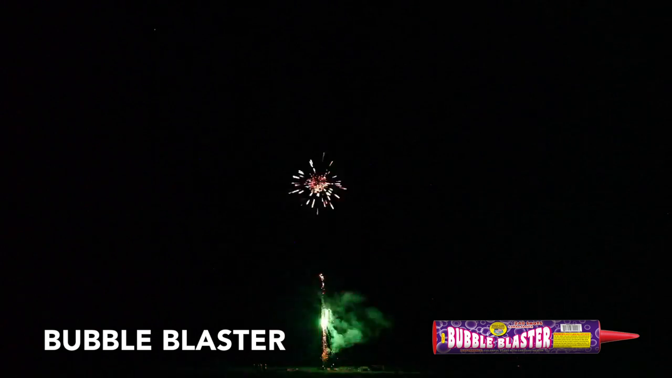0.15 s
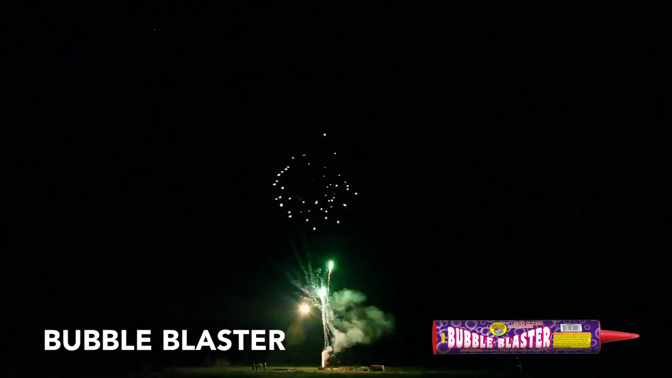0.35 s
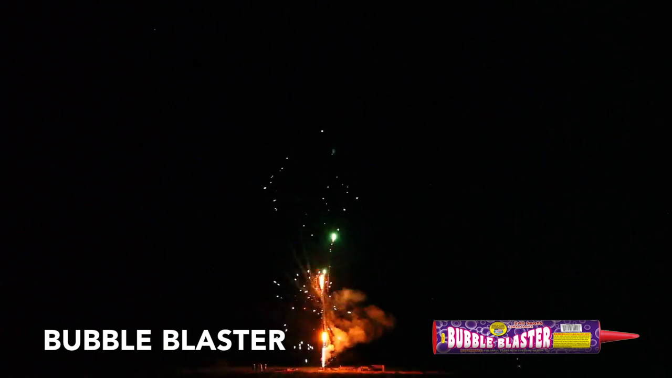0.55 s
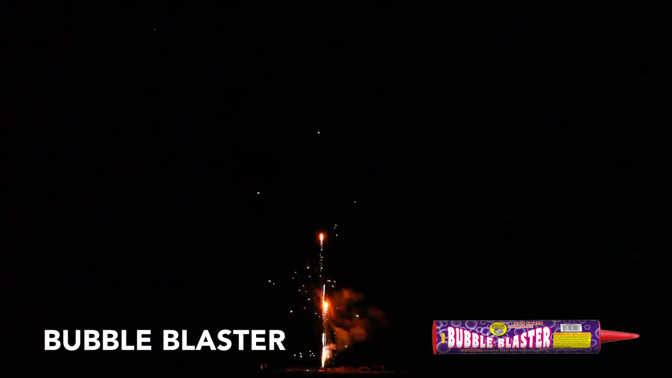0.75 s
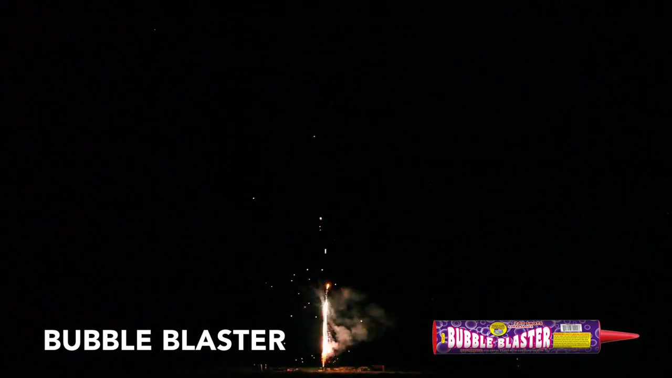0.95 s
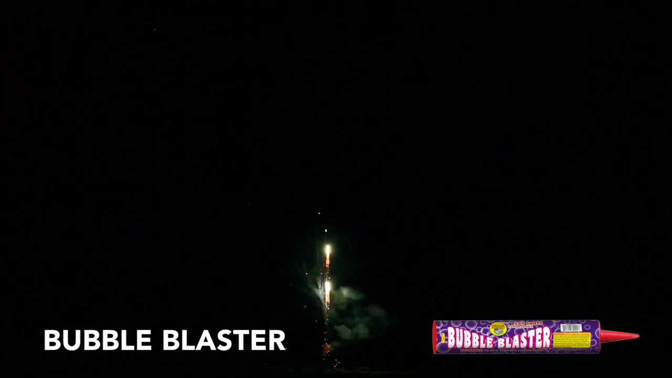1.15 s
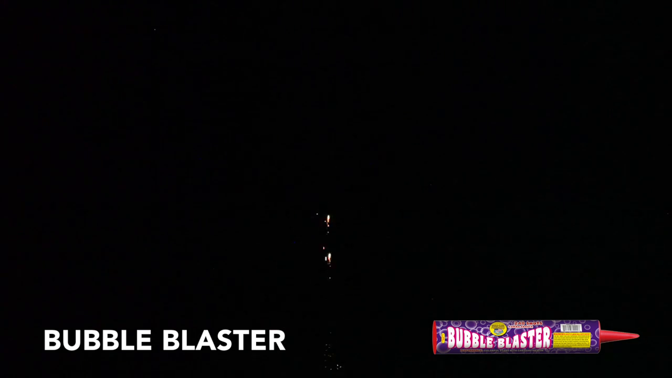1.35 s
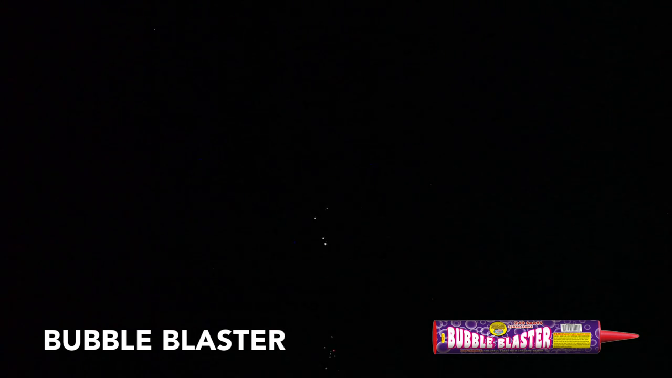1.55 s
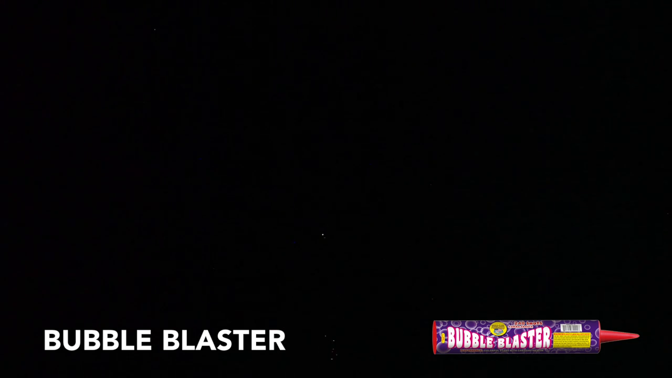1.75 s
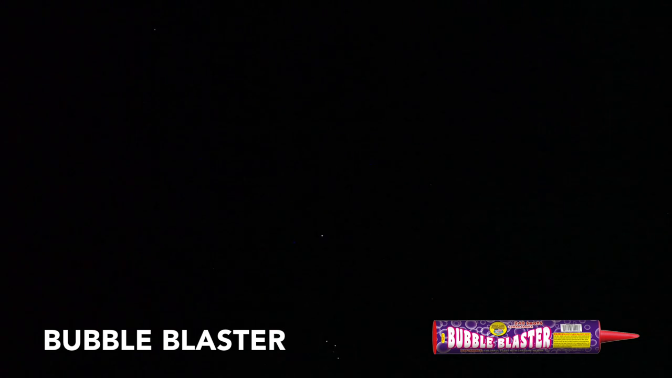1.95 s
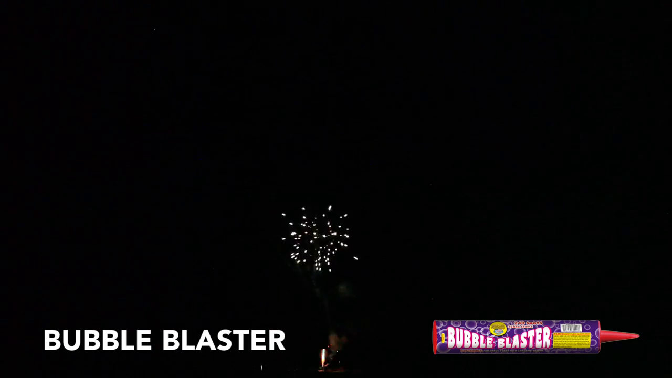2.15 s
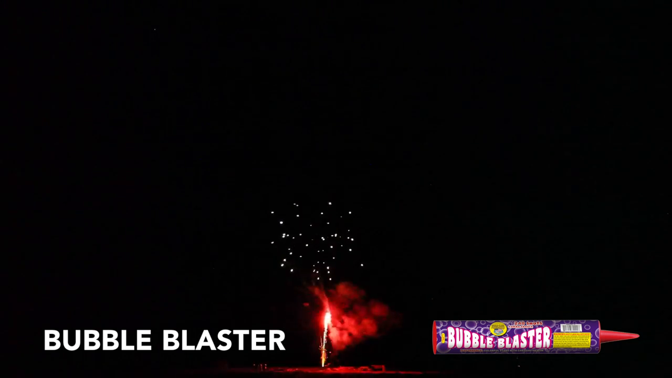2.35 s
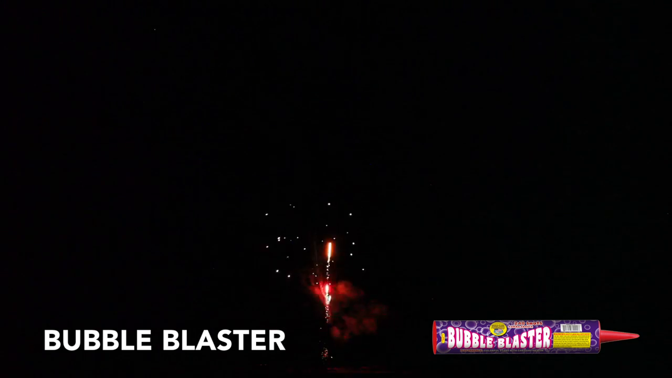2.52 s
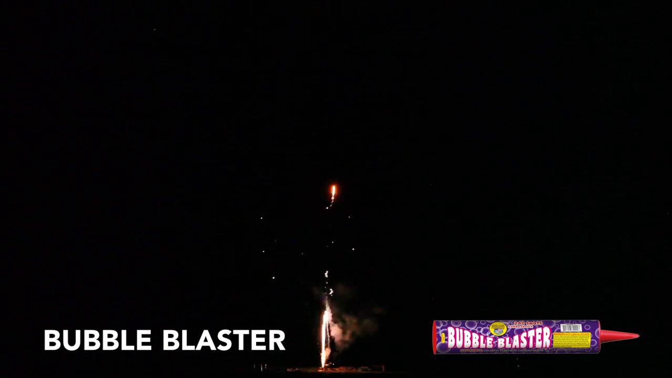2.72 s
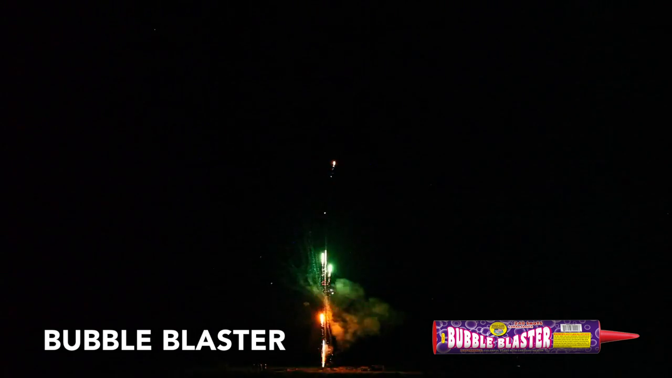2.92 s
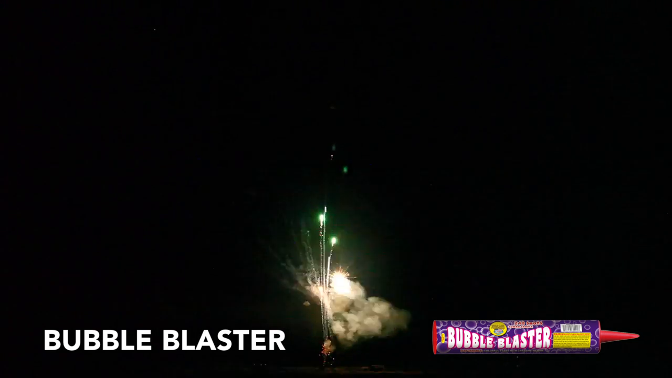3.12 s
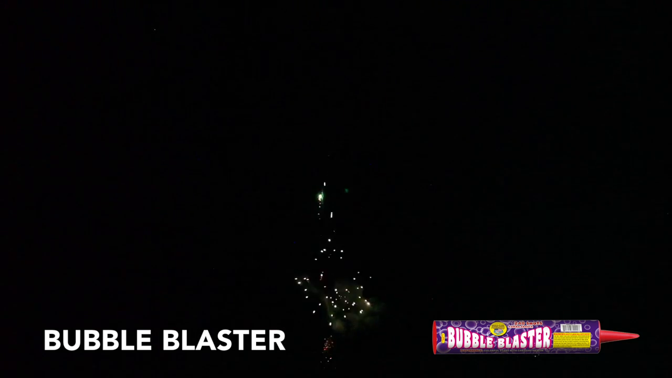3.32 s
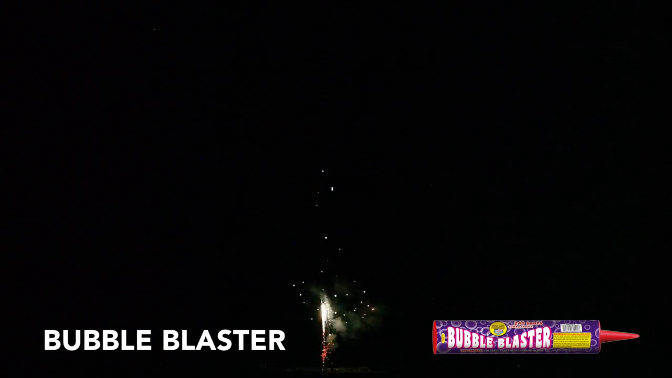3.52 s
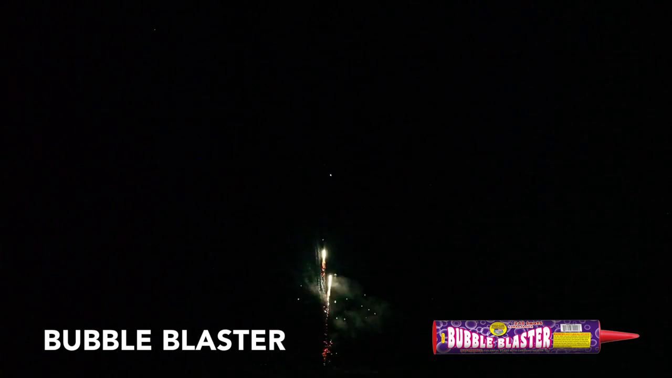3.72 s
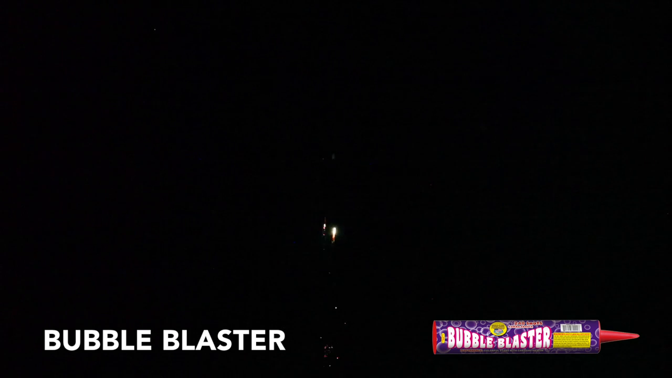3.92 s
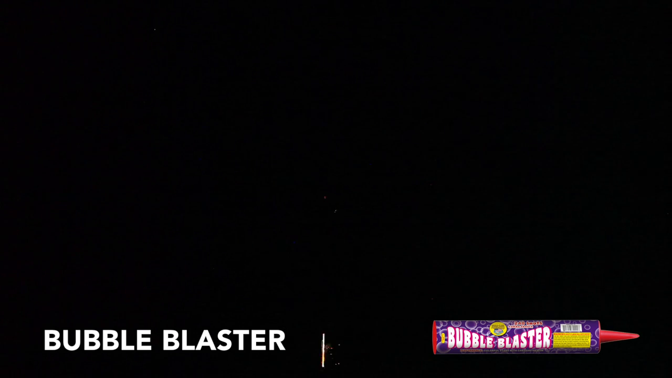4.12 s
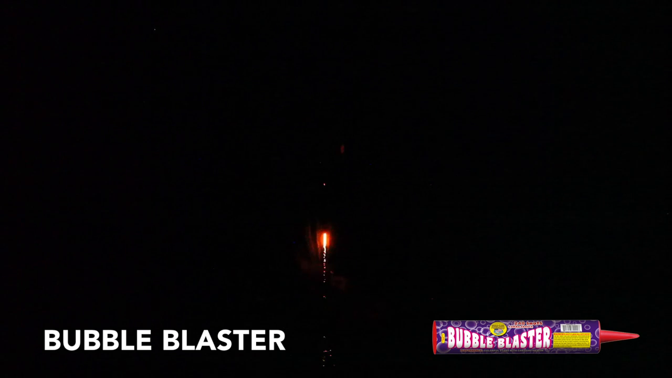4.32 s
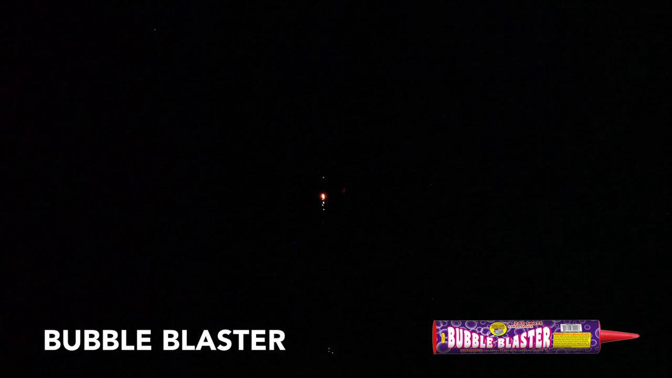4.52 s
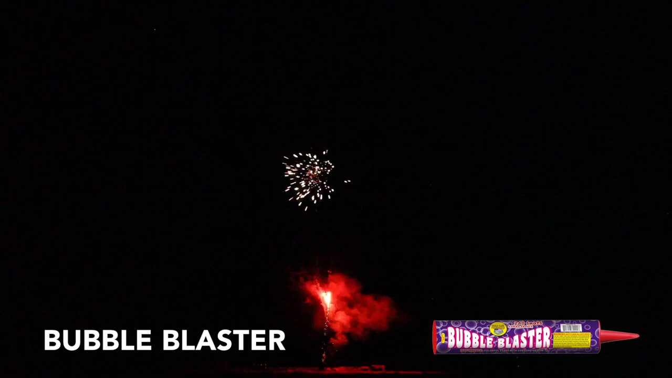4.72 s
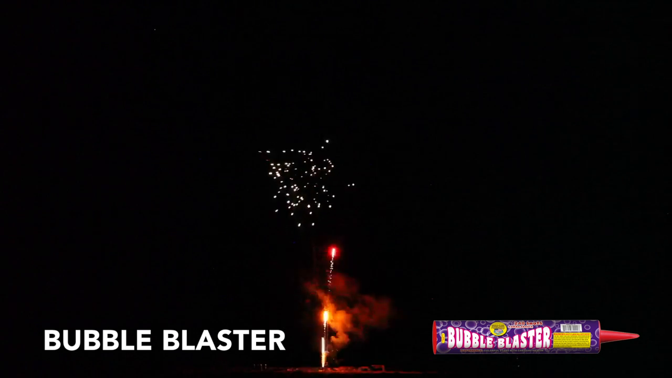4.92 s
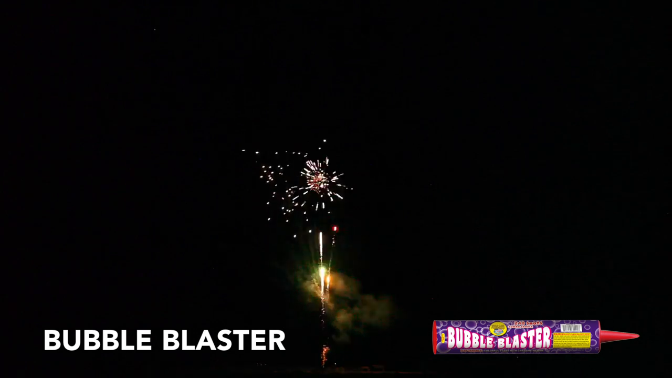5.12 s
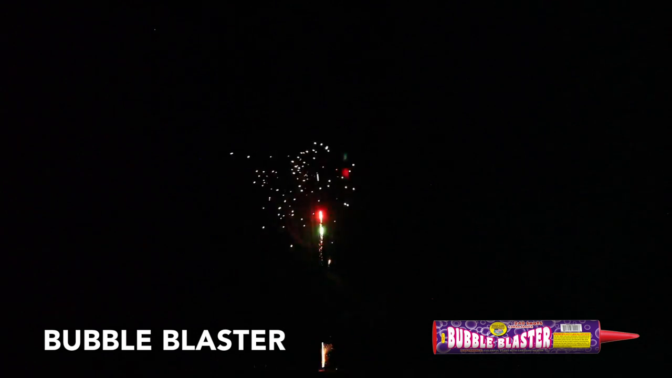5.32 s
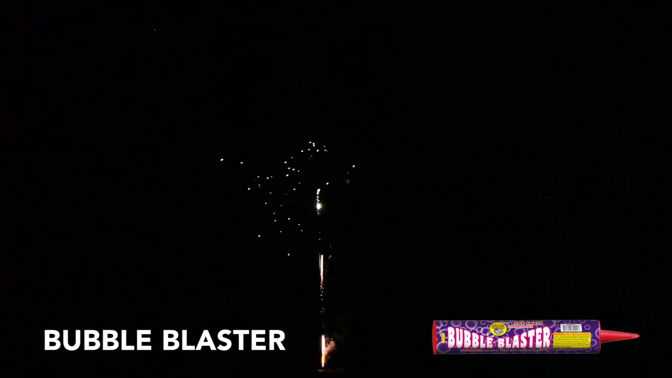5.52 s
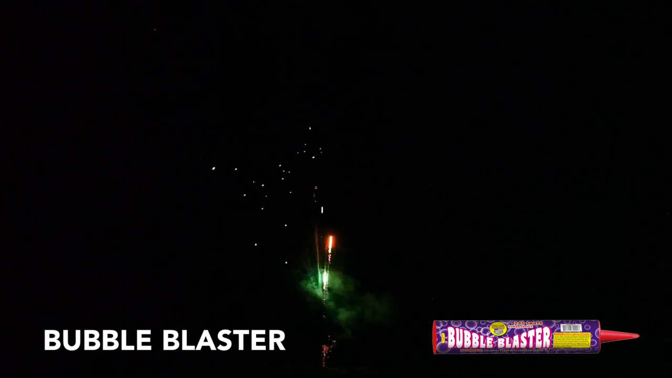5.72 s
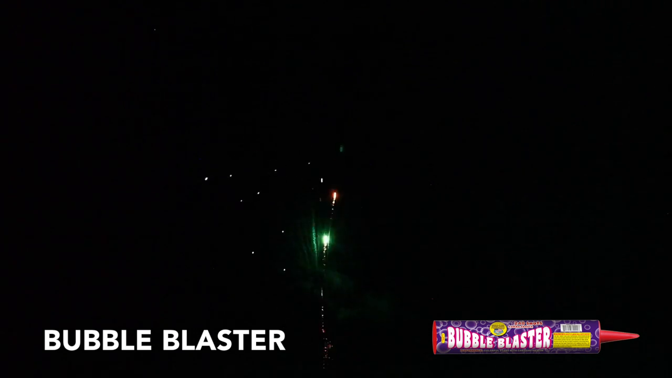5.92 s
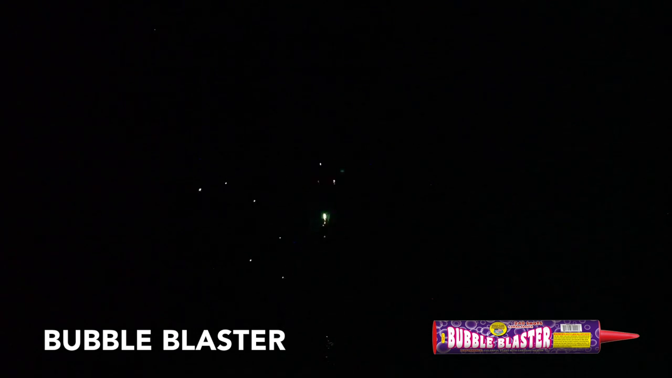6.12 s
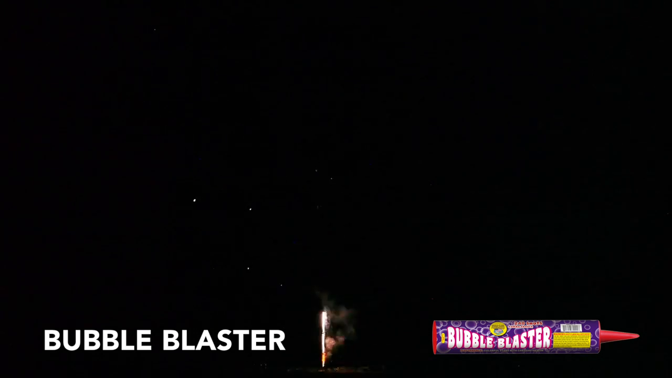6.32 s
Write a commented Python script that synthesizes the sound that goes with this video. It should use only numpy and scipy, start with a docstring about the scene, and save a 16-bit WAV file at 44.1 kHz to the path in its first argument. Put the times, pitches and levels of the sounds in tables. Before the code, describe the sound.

Irregular pops from several firework candles: quick noisy spits around two kilohertz, some crisp and strong, others softer and longer, often overlapping in pairs. Now and then a star explodes overhead with a hard, clipped crack. Open ground answers with bright patchy echoes, wide in stereo, and a faint tail. Volleys alternate with short pauses filled by echo and quiet hiss, and the last pops come just before the end.

```python
"""Firework candles at night

Candles fire on open ground, some tens of metres from a stereo microphone, over hiss of drifting level.
Each lift charge gives a rasp, gas noise in ragged spurts, and a low thump, a short swing of ejected air.
Some stars burst aloft: a brief pressure swing that overloads the recorder and arrives twice, straight
and off the ground. Convolution with patchy, decaying noise and discrete slaps echoes shots and bursts."""
import sys
import numpy as np
from scipy import signal
from scipy.fft import rfft, irfft
from scipy.io import wavfile
from scipy.ndimage import uniform_filter1d

SR = 44100
rng = np.random.default_rng(int(sys.argv[2]) if len(sys.argv) > 2 else 0)


def materialize(psi):
    """Save the field psi as 16-bit PCM at rate SR to the path in sys.argv[1].

    A 1-D psi becomes a single channel; in a 2-D psi each row is a channel.
    """
    bounded = np.clip(np.atleast_2d(psi).T, -1, 1)
    quanta = np.round(bounded * 32767).astype(np.int16)
    wavfile.write(sys.argv[1], SR, quanta)


N = 280476

# Background hiss spectrum, relative: (frequency [Hz], density [dB per Hz])
HISS_SPECTRUM = [(14, -28.5), (23, -4), (105, 6), (153, -3), (242, 0), (927, 3.5), (1060, -0.5),
                 (2250, -3.5), (4910, -4.5), (14400, -7.5)]
# Course of the hiss: (time [s], level of its 9-14 kHz band [dB])
HISS_LEVEL = [(0.1, -57), (0.56, -62), (2.37, -58.5), (2.5, -60), (3.3, -63.5), (4.98, -64.5),
              (5.76, -67.5), (6.36, -66.5)]
# Lift charges: (time [s], rasp peak [dB], thump against rasp [dB], rasp pitch control [Hz],
# rasp decay constant [ms])
LIFT_CHARGES = [(0.179, -12, -16, 1690, 9.1), (0.2243, -4, -15.5, 1910, 3.9),
                (0.5442, -6.5, -19, 1790, 6.4), (0.73, -14.5, -20, 1810, 5.5),
                (0.8593, -19, -19, 1810, 16.3), (0.9112, -15.5, -18, 1890, 12.7),
                (1.025, -6.5, -18.5, 1730, 10.6), (1.0967, -12.5, -18.5, 1900, 8.3),
                (2.2956, -18, -17.5, 1640, 8.8), (2.3095, -22.5, -14, 1770, 17),
                (2.4119, -11.5, -13, 1690, 9.8), (2.5278, -1, -19.5, 2140, 2.8),
                (2.79, -8.5, -15.5, 1930, 5.1), (2.8222, -10, -15, 2100, 7.5), (2.8647, -3, -17.5, 1800, 3),
                (2.8815, -7.5, -19.5, 1820, 9.9), (3.1005, -3, -16, 1880, 3.13),
                (3.594, -17, -14, 2090, 10.4), (3.6075, -19, -11.5, 1590, 3.1),
                (3.7452, -10, -22, 2170, 5.4), (4.3012, -6, -16, 1910, 4.5), (4.748, -12, -15, 2030, 7.8),
                (4.9508, -20, -15.5, 1670, 9.1), (5.0863, -8, -22.5, 1960, 4.3),
                (5.1278, -2, -18.5, 1810, 4.7), (5.1509, -8.5, -14, 2090, 4.1),
                (5.5064, -5.5, -21, 1830, 2.4), (5.5163, -13.5, -19, 1980, 6.1),
                (5.6732, -16.5, -19.5, 1950, 6.6), (5.7094, -9.5, -17.5, 2030, 4.5),
                (5.9688, -15, -11, 2080, 5.5)]
# Rasp spectrum, relative; the ground cancels the band under 1 kHz: (frequency [Hz], density [dB per Hz])
RASP_SPECTRUM = [(300, -33), (600, -30), (1000, -14), (2100, 0), (2570, -7), (3000, -18.5), (4400, -10.5),
                 (5300, -26.5), (6500, -22.5), (8000, -33.5), (13000, -41), (16500, -50.5)]
# What a lift charge sends into the surroundings, against its rasp: (frequency [Hz], density [dB per Hz])
SHOT_FIELD_SPECTRUM = [(280, -35), (560, -8), (1000, 5), (1500, 10.5), (2200, 3), (4200, -5), (8400, -10),
                       (14900, -28.5)]
# Scattered echo field, levels before band filtering: (band centre [Hz], early level [dB], early t60 [s],
# late level [dB], late t60 [s], left-right likeness [0-1])
ECHO_FIELD = [(70.4, -66, 0.44, -69.5, 3.4, 0.7), (144.4, -45, 0.12, -63.5, 0.96, .6),
              (267, -52, 0.55, -76.5, 2.3, .3), (575, -71.5, 0.32, -73.5, 3.2, 0),
              (1150, -60.5, 0.63, -68, 4.5, 0.2), (1560, -63.5, 0.73, -70.5, 1, .2),
              (2250, -49, 0.33, -58, 2, 0), (4130, -43.5, 0.38, -55, 1.9, 0),
              (8900, -61, 0.63, -81, 1.1, 0.6)]
# Larger reflectors, levels before band filtering: (lag [s], spread [ms], centre [Hz], level [dB],
# left minus right [dB])
LARGE_REFLECTORS = [(0.057, 14, 3200, -47.5, -2.5), (.057, 14, 160.1, -56, -0.5),
                    (0.076, 3, 664, -53.5, -15.5), (0.096, 1.7, 683, -60.5, 10),
                    (0.124, 2.8, 1000, -59, 16), (0.148, 2.3, 1250, -65, 4), (0.205, 1.5, 480, -53, -8.5),
                    (0.214, 1.9, 1000, -55, -10.5), (.233, 3, 1700, -56.5, -13),
                    (0.352, 0.96, 860, -55, -17.5), (0.368, 0.56, 540, -53, -3),
                    (0.402, 1.7, 850, -63.5, -15)]
# Bursting stars; higher stars have longer lags: (time [s], ground bounce lag [ms], wall echo lag [ms])
STAR_BURSTS = [(.30156, 1.84, 63.5), (.57096, .92, 52), (2.19763, 1.39, 55.5), (3.31676, 1.09, 50),
               (4.79426, 1.97, 65), (5.27426, 1.94, 57)]

SIDES = np.array([[1], [-1]])  # left, right: a pan in dB is left minus right
LEAD_IN_MS = 10  # room ahead of each shot for its build-up

RISE_MS, RISE_MS_PER_DB = 1.2, 0.14  # weaker charges build up more slowly
SPURT_DB = 3.84  # standard deviation of the raggedness
RASP_PAN_DB, RASP_UNLIKE_DB = 2, -3.5
LEFT_LAG = 1  # samples, for the tubes on the ground
NEAR_ECHO_MS, NEAR_ECHO_DB = 23, -17  # a small bright reflector behind the tubes
THUMP_HZ, THUMP_CENTRE_MS, THUMP_WIDTH_MS = 150, 3.0, 2.4
THUMP_PITCH_SCATTER = .15  # standard deviation of the log of each thump's pace

THUMP_FIELD_DB, BLAST_FIELD_DB = 4, -4  # sent to the surroundings, against the direct sound
FIELD_ONSET_MS = 7.2
FIELD_PATCHY_DB = 1  # standard deviation, separate in each band
FIELD_GRAIN_DB = 2.6  # single bushes and posts stand out of the scatter in all bands at once

BLAST_HZ, BLAST_LEAD, BLAST_WIDTH_MS = 720, .7, .54  # swing, radians already past the crest, length
BLAST_DB, BOUNCE_DB = 14, -5  # the bounce is against the blast
BOUNCE_LEAD, BOUNCE_WIDTH_MS = .45, .52  # soft ground broadens the crest and weakens the suction
BOUNCE_PAN_DB, BOUNCE_RIGHT_LAG = -3, 2  # it reaches the right port stronger and samples later
RATTLE_DB, RATTLE_UNLIKE = -19.5, 1.1  # scatter from things near the microphone
RATTLE_FALL_MS, RATTLE_HZ = 2.8, 6000
RIGHT_ECHO_DB, RIGHT_ECHO_PAN_DB = -23.5, -8
RIGHT_ECHO_MS, RIGHT_ECHO_PER_BOUNCE = 3.3, 1.6  # its lag grows with the bounce lag
WALL_ECHO_DB = -32

TOP_HZ = 15600


def undb(db):
    """Level law: amplitude is ten to the power of dB over twenty."""
    return 10 ** (np.asarray(db) / 20)


def colour(x, points, stretch=1):
    """Spectral shaping: weight by (Hz, dB) points, their frequencies multiplied by stretch."""
    hz, db = np.transpose(points)
    size = x.shape[-1]
    f = np.maximum(np.fft.rfftfreq(size, 1 / SR), 1)
    gain_db = np.interp(np.log(f), np.log(hz * stretch), db)
    return irfft(rfft(x) * undb(gain_db), size)


def band(x, lo_hz, hi_hz):
    """Band limitation by a Butterworth filter."""
    sos = signal.butter(2, [lo_hz, min(hi_hz, .45 * SR)], "band", fs=SR, output="sos")
    return signal.sosfilt(sos, x)


def add(out, x, s):
    """Superposition: pressures add, here x into out from s seconds."""
    i = int(round(s * SR))
    out[..., i:i + x.shape[-1]] += x[..., :N - i]


def smooth_noise(noise, size):
    """Averaging of independent draws: a running mean, rescaled to keep the variance."""
    return uniform_filter1d(noise, size=size) * np.sqrt(size)


def hiss():
    """Stationary random noise: coloured hiss and far rumble, independent by channel, slowly changing level."""
    noise = colour(rng.standard_normal((2, N)), HISS_SPECTRUM)
    noise = noise / np.std(band(noise, 9000, 14000))
    s, db = np.transpose(HISS_LEVEL)
    return noise * undb(np.interp(np.arange(N) / SR, s, db))


def rise_ms(db):
    """Charge build-up: the rise time constant grows as the rasp's peak level falls."""
    return max(RISE_MS - RISE_MS_PER_DB * db, .3)


def thump(ms, db):
    """Air-column oscillation: the ejected column swings briefly, as a cosine under a Gaussian."""
    swing = np.cos(2 * np.pi * THUMP_HZ * (ms + .8) / 1000)
    envelope = np.exp(-.5 * ((ms - THUMP_CENTRE_MS) / THUMP_WIDTH_MS) ** 2)
    return swing * envelope * undb(db)


def shots():
    """Turbulent jet noise: gas rasps out of the tube in spurts while the ejected air column thumps once."""
    out, size = np.zeros((2, N)), 4096
    ms = np.arange(size) / SR * 1000 - LEAD_IN_MS
    chance = rng.standard_normal((len(LIFT_CHARGES), 3, size))
    for (s, rasp_db, thump_db, hz, fall), (mid, side, spurt) in zip(LIFT_CHARGES, chance):
        rise = rise_ms(rasp_db)
        pace = np.exp(THUMP_PITCH_SCATTER * spurt[0])
        t = np.maximum(ms + 1.064 * rise, 0)  # the flow sets in ahead of the listed time
        flow = (1 - np.exp(-t / rise)) ** 2 * np.exp(-t / fall)
        flow = flow * undb(SPURT_DB * smooth_noise(spurt, 30))
        # the two ports hear the same low mids but unlike treble
        unlike = band(side * flow, 3500, 16000) * undb(RASP_UNLIKE_DB)
        # the spectrum shifts by the square root of the pitch control
        rasp = colour(mid * flow + SIDES * unlike, RASP_SPECTRUM, (hz / 2000) ** .5)
        rasp = rasp / np.abs(rasp.mean(0)).max()
        rasp = rasp * undb(rasp_db + SIDES * RASP_PAN_DB / 2)
        add(out, rasp + thump(ms * pace, rasp_db + thump_db), s - LEAD_IN_MS / 1000)
        near_echo = band(rasp, 3100, 5500) * undb(NEAR_ECHO_DB)
        add(out, near_echo, s + (NEAR_ECHO_MS - LEAD_IN_MS) / 1000)
    left, right = out
    return np.array([np.roll(left, LEFT_LAG), right])


def outgoing():
    """Impulsive excitation: each shot and burst sends plain pulses over the ground to the reflectors."""
    rasps, rest = np.zeros((2, N))
    ms = np.arange(1200) / SR * 1000
    for s, rasp_db, thump_db, _, fall in LIFT_CHARGES:
        # longer rasps carry more energy
        add(rasps, undb(rasp_db) * np.sqrt([rise_ms(rasp_db) + fall]), s)
        sent_thump = thump(ms - LEAD_IN_MS, rasp_db + thump_db + THUMP_FIELD_DB)
        add(rest, sent_thump, s - LEAD_IN_MS / 1000)
    sent_blast = band(blast(ms), 350, 16000)  # the ground swallows its low end
    for s, *_ in STAR_BURSTS:
        add(rest, undb(BLAST_DB + BLAST_FIELD_DB) * sent_blast, s)
    return colour(rasps, SHOT_FIELD_SPECTRUM) + rest


def surroundings():
    """Impulse response of scattering: patchy noise with two decays per band, and slaps off big reflectors."""
    size = int(2.5 * SR)
    t = np.arange(size) / SR
    out = 0
    grain = FIELD_GRAIN_DB * smooth_noise(rng.standard_normal(size), 90)
    for hz, early_db, early, late_db, late, like in ECHO_FIELD:
        mid, side, patch = rng.standard_normal((3, size))
        noise = np.sqrt(1 + like) * mid + np.sqrt(1 - like) * SIDES * side
        patchy = FIELD_PATCHY_DB * smooth_noise(patch, 300)
        fade = undb(early_db - 60 * t / early) + undb(late_db - 60 * t / late)
        scatter = noise * fade * undb(patchy + grain)
        out = out + band(scatter, hz / np.sqrt(2), hz * np.sqrt(2))
    out = out * (1 - np.exp(-t * 1000 / FIELD_ONSET_MS))
    roughness = rng.standard_normal((len(LARGE_REFLECTORS), size))
    for (lag, spread, hz, db, pan_db), rough in zip(LARGE_REFLECTORS, roughness):
        envelope = np.exp(-.5 * ((t - lag) * 1000 / spread) ** 2)
        slap = band(rough * envelope, hz / 2, hz * 2)
        out = out + slap * undb(db + SIDES * pan_db / 2)
    return out


def echoes():
    """Linear superposition of reflections: the outgoing pulses convolved with the surroundings."""
    return signal.fftconvolve(outgoing()[None], surroundings(), axes=1)[:, :N]


def blast(ms, lead=BLAST_LEAD, width_ms=BLAST_WIDTH_MS):
    """Blast wave: a sharp overpressure, a longer suction and a small rebound."""
    swing = np.cos(2 * np.pi * BLAST_HZ * ms / 1000 + lead) * np.exp(-(ms / width_ms) ** 2)
    return band(swing, 85, 18000)


def bursts():
    """Multipath propagation: blast, ground bounce, nearby scatter, an echo from the right, one from a wall."""
    out, size = np.zeros((2, N)), 1500
    ms = np.arange(size) / SR * 1000
    direct = blast(ms)
    bounce = undb(BLAST_DB + BOUNCE_DB) * blast(ms, BOUNCE_LEAD, BOUNCE_WIDTH_MS)
    right_level = undb(BLAST_DB + RIGHT_ECHO_DB + SIDES * RIGHT_ECHO_PAN_DB / 2)
    right_echo = right_level * band(direct, 800, 3500)
    wall_echo = undb(BLAST_DB + WALL_ECHO_DB) * band(direct, 700, 6100)
    rattle_fade = np.exp(-ms / RATTLE_FALL_MS) + undb(-9) * np.exp(-ms / 5)
    rattle_fade = rattle_fade * np.minimum(ms / .5, 1) ** 2
    chance = rng.standard_normal((len(STAR_BURSTS), 3, size))
    for (s, lag, wall), (mid, left, right) in zip(STAR_BURSTS, chance):
        grit = mid + RATTLE_UNLIKE * np.array([left, right])
        grit = band(band(grit, 330, RATTLE_HZ), 150, RATTLE_HZ)
        add(out, undb(BLAST_DB) * (direct + undb(RATTLE_DB) * grit * rattle_fade), s)
        add(out[0], bounce * undb(BOUNCE_PAN_DB / 2), s + lag / 1000)
        add(out[1], bounce * undb(-BOUNCE_PAN_DB / 2), s + lag / 1000 + BOUNCE_RIGHT_LAG / SR)
        add(out, right_echo, s + (RIGHT_ECHO_MS + RIGHT_ECHO_PER_BOUNCE * lag) / 1000)
        for path in (0, lag):  # straight and off the ground
            add(out, wall_echo, s + (wall + path) / 1000)
    return out


def scene():
    """Superposition of the independent sources and their echoes at the microphone."""
    return hiss() + shots() + echoes() + bursts()


def record(dry):
    """Overload and band limitation: the converter clips at full scale and the top is cut."""
    low_pass = signal.ellip(8, .2, 70, TOP_HZ, fs=SR, output="sos")
    return signal.sosfilt(low_pass, np.clip(dry, -1, 1))


dry = scene()
out = record(dry)
materialize(out)
```